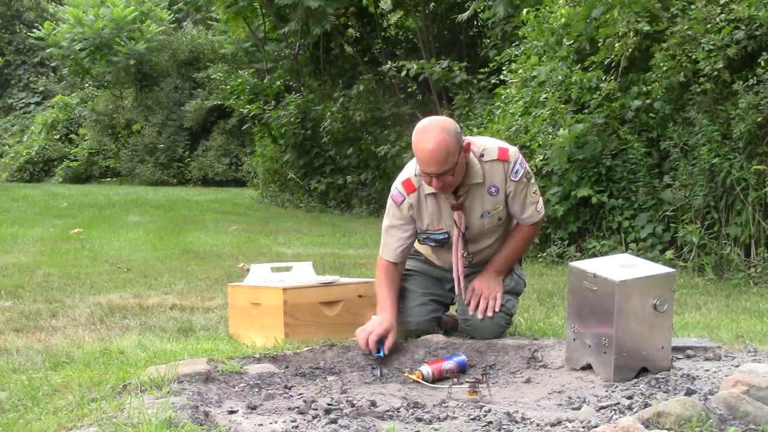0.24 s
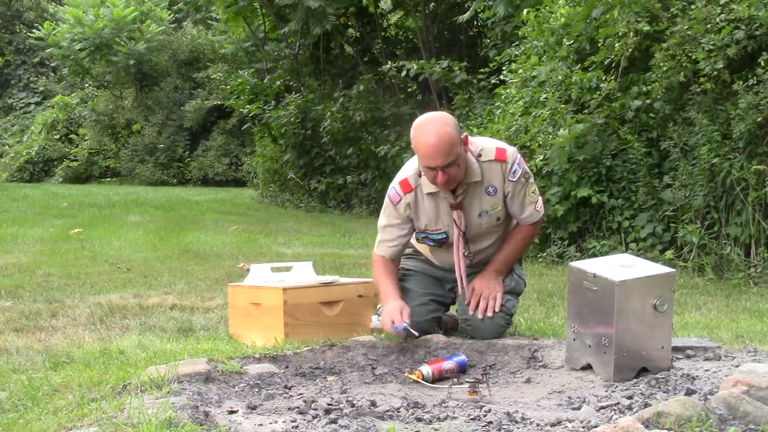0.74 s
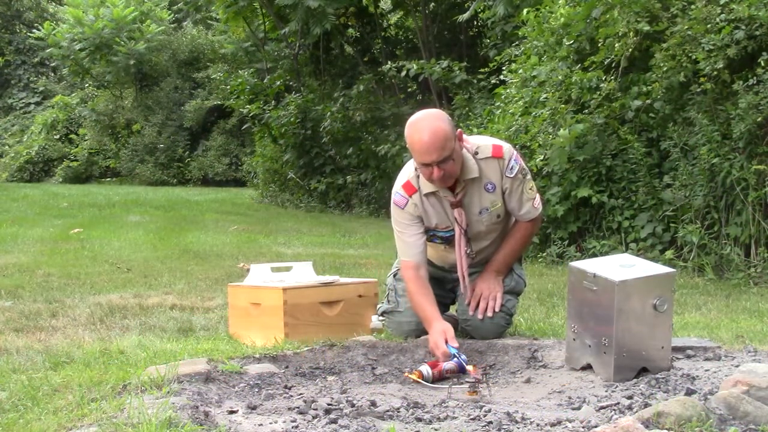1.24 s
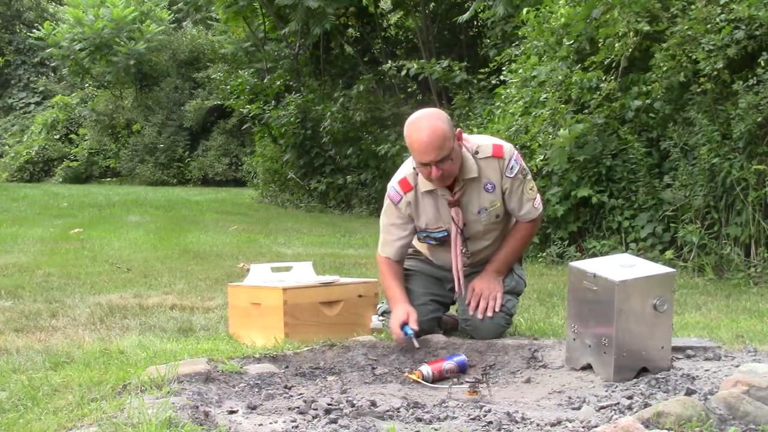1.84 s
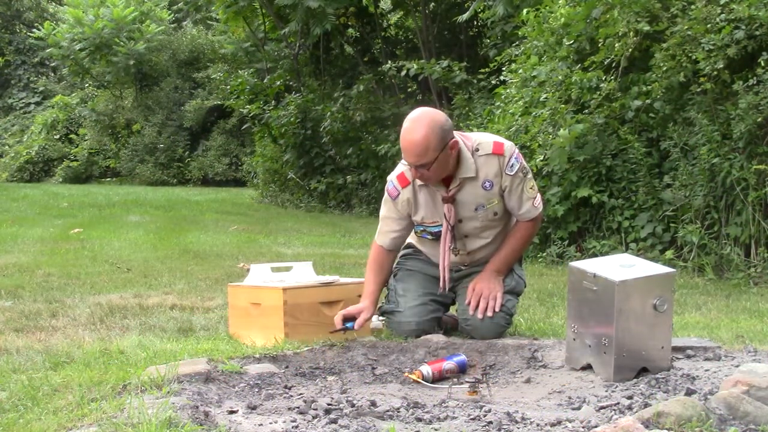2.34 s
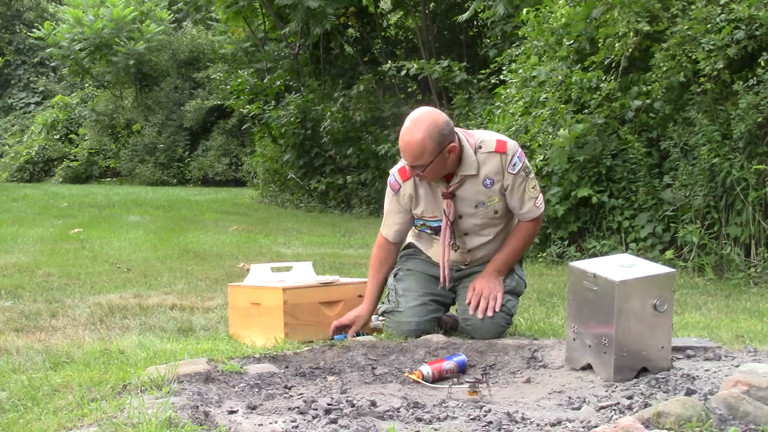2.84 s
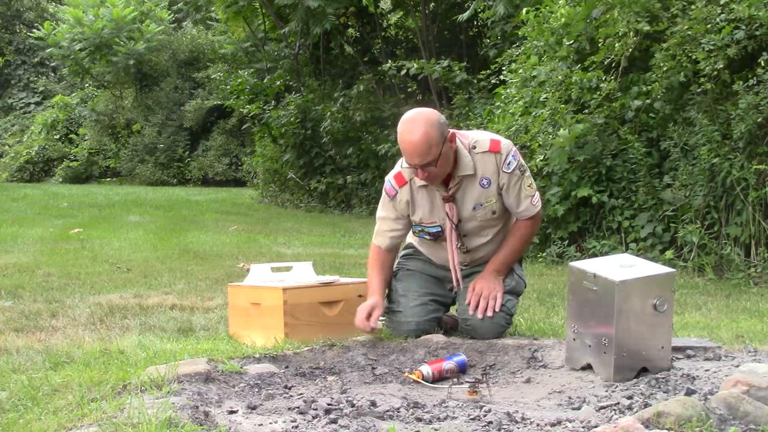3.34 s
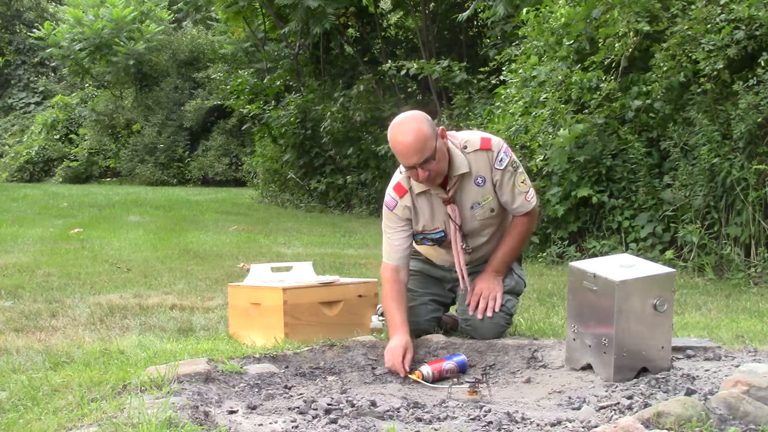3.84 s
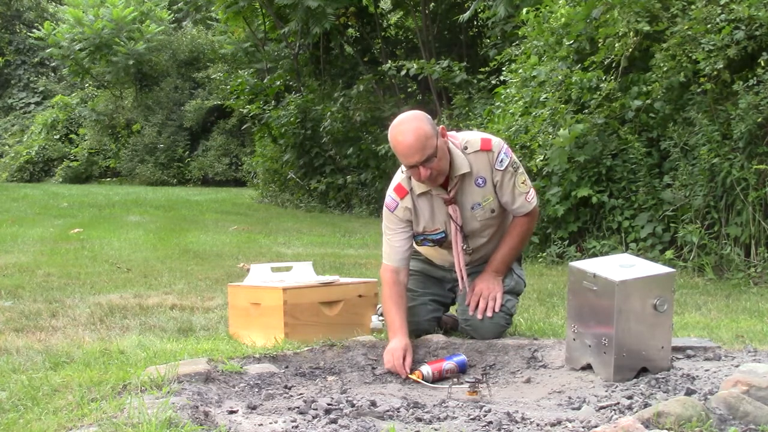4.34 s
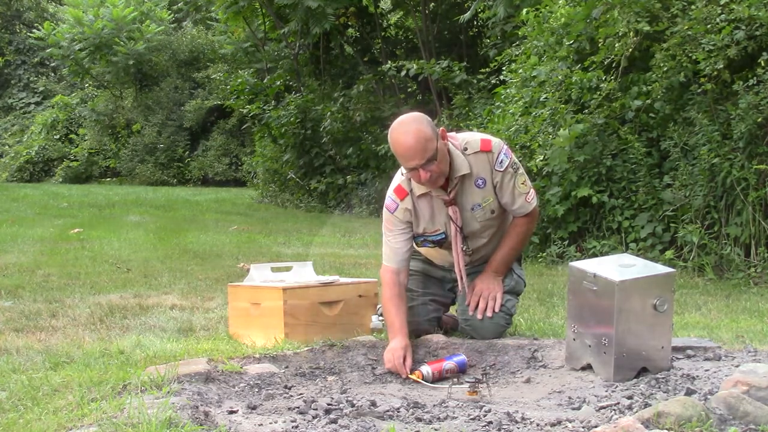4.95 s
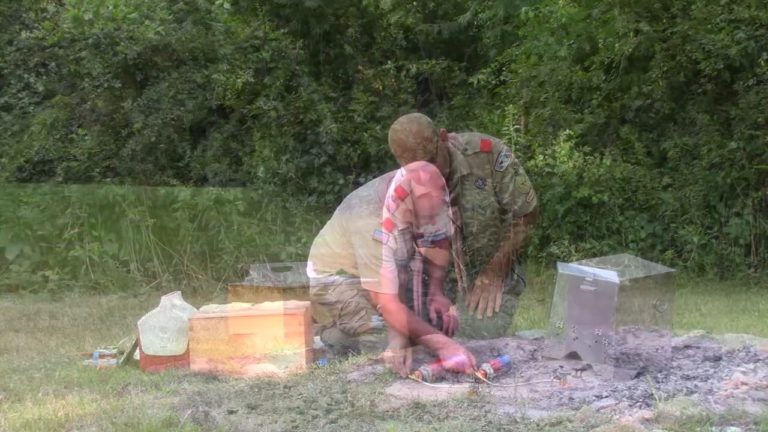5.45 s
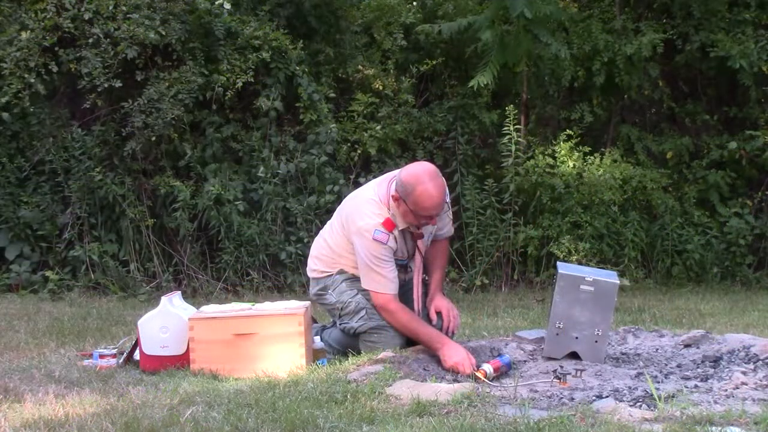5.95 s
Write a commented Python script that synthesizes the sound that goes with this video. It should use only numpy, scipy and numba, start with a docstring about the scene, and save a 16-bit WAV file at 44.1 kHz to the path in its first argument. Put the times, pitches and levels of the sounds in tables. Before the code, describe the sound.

After light rustles and two sharp lighter clicks, fuel vapour ignites with a soft thump and burns steadily over faint insects.

```python
"""A small spirit stove is lit on the ground at the edge of a lawn, heard from close by. Over open air, a far
rumble and a faint wandering hiss come two thin notes, rustles and small knocks. A lighter snaps twice, its
hammer ringing the case; the vapour catches with a soft whump and burns on with a low turbulent rush, while high
insects shimmer in the hedge. Near the end the sound steps with a tick: the hiss falls back and a soft midrange
wash comes up."""
import sys
import numpy as np
from scipy import signal
from scipy.fft import rfft, irfft
from scipy.io import wavfile
from scipy.ndimage import uniform_filter1d
from numba import njit

SR = 44100
rng = np.random.default_rng(int(sys.argv[2]) if len(sys.argv) > 2 else 0)


def generate_wav(sig):
    """Save sig (samples, or channels by samples) to the path in sys.argv[1] as 16-bit PCM at SR."""
    pcm = np.round(np.clip(np.atleast_2d(sig).T, -1, 1) * 32767).astype(np.int16)
    wavfile.write(sys.argv[1], SR, pcm)


N = 273420
TIME = np.arange(N) / SR
LIT_S, STEP_S = 1.2575, 5.396

# spectrum of burning vapour: frequency_hz, density_db
FLAME_COLOUR = [(30, -53), (80, -8.5), (125, -6.5), (200, 0), (300, -.5), (390, 1.5), (450, -4), (540, -10),
                (630, -20), (720, -29.5), (850, -45), (1800, -74)]


def from_db(db):
    """Decibels to gain."""
    return 10 ** (np.asarray(db) / 20)


def unit_rms(x):
    """Scale to unit rms."""
    return x / np.sqrt(np.mean(x ** 2) + 1e-20)


def unit_hit(x):
    """Scale a hit so that its loudest 2 ms have unit rms."""
    return x / np.sqrt(uniform_filter1d(x * x, size=88).max())


def automation(rows):
    """Join breakpoints (time first) into one curve per remaining column."""
    times, *columns = np.transpose(rows)
    return [np.interp(TIME, times, column) for column in columns]


def late_switch(early, late):
    """Step from one setting to another where the sound steps near the end."""
    return np.where(TIME < STEP_S, early, late)


def dying(start_s, decay_s):
    """Envelope that jumps to 1 and dies away."""
    return (TIME >= start_s) * np.exp(-np.clip((TIME - start_s) / decay_s, 0, 60))


def swell(peak_s, half_length_s):
    """Bell-shaped envelope."""
    return np.exp(-.5 * ((TIME - peak_s) / half_length_s) ** 2)


def noise(colour):
    """Unit noise with the given spectrum, rolled off below its first point."""
    hz, db = np.transpose(colour)
    grid = np.maximum(np.fft.rfftfreq(N, 1 / SR), 1)
    gain = from_db(np.interp(np.log(grid), np.log(hz), db))
    low_cut = np.minimum(grid / hz[0], 1) ** 2 * (grid > 1)
    return unit_rms(irfft(rfft(rng.standard_normal(N)) * gain * low_cut, N))


def drift(rate_hz):
    """Smooth random wander of spread 1, up to about rate_hz."""
    grid = np.fft.rfftfreq(N, 1 / SR)
    return unit_rms(irfft(rfft(rng.standard_normal(N)) / (1 + (grid / rate_hz) ** 2), N))


def narrow_noise(hz, width_hz):
    """Unit noise in a steep-sided band round a centre that may move."""
    offset_hz = np.fft.fftfreq(N, 1 / SR)
    white = rng.standard_normal(N) + 1j * rng.standard_normal(N)
    wobble = np.fft.ifft(np.fft.fft(white) / (1 + np.abs(offset_hz / width_hz) ** 3))
    carrier = np.exp(2j * np.pi * np.cumsum(hz * np.ones(N)) / SR)
    return unit_rms(np.real(wobble * carrier))


def resonate(x, hz, width_hz):
    """One resonance with gain 1 at its peak."""
    r = np.exp(-np.pi * width_hz / SR)
    feedback = [1, -(1 + r * r) * np.cos(2 * np.pi * hz / SR), r * r]
    return signal.lfilter(np.array([1, 0, -1]) * (1 - r * r) / 2, feedback, x + 1e-18)


@njit
def swept_resonance(x, hz, width_hz):
    """The same resonance with a centre that moves sample by sample."""
    r = np.exp(-np.pi * width_hz / SR)
    coupling = (1 + r * r) * np.cos(2 * np.pi * hz / SR)
    y = np.zeros(len(x))
    for i in range(2, len(x)):
        y[i] = (1 - r * r) / 2 * (x[i] - x[i - 2]) + coupling[i] * y[i - 1] - r * r * y[i - 2]
    return y


def outdoors(air_trim_db=4.5, late_air_db=-55, wash_rise_db_per_s=3):
    """Leaves and open air over a far rumble; a soft wash creeps in and steps up near the end."""
    # rise and fall of the open air: time_s, level_db
    air_levels = [(0.05, -58.5), (0.37, -55), (0.74, -60), (1.13, -53.5), (2.23, -61), (4.98, -59.5),
                  (5.18, -58.5), (5.3, -57.5)]
    # spectrum of the air: frequency_hz, density_db
    air_colour = [(200, 0), (600, 2), (850, -0.5), (1200, 0.5), (1700, 2), (2500, 0.5), (3100, 0),
                  (5000, -5.5), (8000, -9.5), (11000, -15.5), (16000, -17.5)]
    # spectrum of the rumble: frequency_hz, density_db
    rumble_colour = [(20, 1.5), (40, -7.5), (50, 1), (58, 6.5), (72, -2.5), (95, -7), (118, 0), (145, -7),
                     (220, -13), (400, -13.5), (800, -29), (3000, -84)]
    air_db, = automation(air_levels)
    air_db = late_switch(air_db + air_trim_db, late_air_db)
    rumble_db = late_switch(np.where(TIME < LIT_S, -44, -47.5), -44)   # ducks while the stove first burns
    wash_db = late_switch(-81 + wash_rise_db_per_s * TIME, -57.5)
    air = from_db(air_db) * noise(air_colour)
    rumble = from_db(rumble_db) * noise(rumble_colour)
    wash = from_db(wash_db) * narrow_noise(hz=1100, width_hz=280)
    return air + rumble + wash


def hiss(trim_db=3.5, late_db=-53, ease_db_per_s=4, sizzle_trim_db=-1, late_sizzle_db=-72):
    """A faint broad hiss topped by thin sizzle; near the end the sizzle drops and the hiss eases."""
    # rise and fall of the hiss: time_s, level_db
    hiss_levels = [(0.05, -57), (0.92, -58.5), (1.72, -64), (2.13, -60.5), (2.52, -61), (3.39, -62.5),
                   (3.86, -55.5), (5.2, -55.5), (5.36, -56.5)]
    # spectrum of the hiss: frequency_hz, density_db
    hiss_colour = [(2600, -25), (3100, -15.5), (3430, 2), (4100, 2), (5200, 0), (6100, -2), (6700, -1),
                   (7500, -6), (8400, -8), (9100, -8.5), (12000, -42)]
    # rise and fall of the sizzle: time_s, level_db
    sizzle_levels = [(.1, -66), (.6, -57), (1.1, -56.5), (1.28, -68), (1.47, -57), (2.05, -58), (2.9, -71),
                     (3.4, -64), (5.02, -72), (5.25, -52.5)]
    # spectrum of the sizzle: frequency_hz, density_db
    sizzle_colour = [(5000, -12), (6600, 8), (7300, 3.5), (8300, -11), (9200, 1), (11500, -2.5),
                     (12800, -12), (14500, -1), (16000, -12)]
    hiss_db, = automation(hiss_levels)
    sizzle_db, = automation(sizzle_levels)
    hiss_db = late_switch(hiss_db + trim_db, late_db - ease_db_per_s * (TIME - STEP_S))
    sizzle_db = late_switch(sizzle_db + sizzle_trim_db, late_sizzle_db)
    return from_db(hiss_db) * noise(hiss_colour) + from_db(sizzle_db) * noise(sizzle_colour)


def wandering_hiss(trim_db=-0.3, fade_db_per_s=60):
    """A narrow band of hiss wanders and fades after the lighting; a higher one then comes in surges."""
    # path of the wandering band: time_s, centre_hz, level_db
    path = [(.05, 6260, -55.5), (.26, 5590, -53), (.6, 5880, -52.5), (.86, 6410, -49), (.95, 5530, -45.5),
            (1.2, 5420, -50), (1.3, 5550, -60), (1.47, 5640, -56), (1.75, 4470, -58)]
    # surges of the higher band: peak_s, level_db, half_length_s
    surges = [(2.38, -57, 0.12), (3.304, -60.5, 0.11), (4.25, -68, 0.048), (5.28, -53.5, 0.22)]
    centre_hz, level_db = automation(path)
    fade_db = fade_db_per_s * np.maximum(TIME - path[-1][0], 0)
    wandering = from_db(level_db + trim_db - fade_db) * narrow_noise(centre_hz, width_hz=720)
    surging = sum(from_db(db) * swell(peak_s, half_s) for peak_s, db, half_s in surges)
    return wandering + late_switch(surging, 0) * narrow_noise(hz=7010, width_hz=550)


def hollowed(x, late_depth=0.75, late_upper_depth=0.2, late_lowest_hz=3540):
    """Narrow notches come and go, as when a near reflection cancels parts of the sound."""
    # course of the hollowness: time_s, depth (0-1), lowest_notch_hz
    hollowness = [(1.8, 0.23, 3280), (2.2, 0.57, 3300), (3.1, .2, 3200), (3.9, 0.65, 2990),
                  (5.39, 0.77, 2830)]
    # the higher notches: centre_hz, width_hz
    upper_notches = [(6620, 150), (9050, 585), (11400, 450)]
    depth, lowest_hz = automation(hollowness)
    lowest_hz = late_switch(lowest_hz, late_lowest_hz)
    x = x - late_switch(depth, late_depth) * swept_resonance(x, lowest_hz, width_hz=750)
    for hz, width_hz in upper_notches:
        x = x - late_switch(depth, late_upper_depth) * resonate(x, hz, width_hz)
    return x


def swishing(x):
    """The treble swishes: patches some 500 Hz wide swell and fade within a quarter second."""
    hz, _, frames = signal.stft(x, SR, nperseg=512)
    patches = rng.standard_normal(frames.shape)
    for _ in range(2):
        patches = uniform_filter1d(patches, size=6, axis=0)   # across frequency
        patches = uniform_filter1d(patches, size=30, axis=1)   # across time
    depth_db = np.interp(hz, [1000, 3500, 7000], [0, 1.3, 2.1])
    gain = from_db(depth_db[:, None] * unit_rms(patches))
    return signal.istft(frames * gain, SR)[1][:N]


def whistle(half_length_s=0.024, fall_hz_per_s=1000):
    """A thin far whistle of two notes, each falling slightly."""
    # whistled notes: peak_s, pitch_hz, level_db
    notes = [(.212, 3480, -50.5), (.337, 3350, -52)]
    out = np.zeros(N)
    for peak_s, pitch_hz, db in notes:
        glide_hz = pitch_hz - fall_hz_per_s * (TIME - peak_s)
        out += from_db(db) * swell(peak_s, half_length_s) * np.sin(2 * np.pi * np.cumsum(glide_hz) / SR)
    return out


def rustles():
    """Sleeve and grass rub in short soft swells of friction noise."""
    # brushes of cloth and grass: peak_s, level_db, half_length_s, centre_hz, width_hz
    brushes = [(0.271, -47, 0.016, 2960, 3500), (0.73, -50.5, 0.029, 2650, 1200),
               (1.083, -45.5, 0.015, 1790, 2500), (1.93, -58, 0.038, 1460, 1500),
               (3.104, -53, 0.021, 2580, 3490)]
    out = np.zeros(N)
    for peak_s, db, half_length_s, hz, width_hz in brushes:
        friction = unit_rms(resonate(rng.standard_normal(N), hz, width_hz))
        out += from_db(db) * swell(peak_s, half_length_s) * friction
    return out


def knocks(bump_hz=105, bump_decay_s=0.0022):
    """Gritty ticks and soft bumps, mostly of handling; the last tick falls where the sound steps."""
    # small knocks and ticks: start_s, level_db, centre_hz, width_hz, decay_s
    ticks = [(.308, -38, 1740, 200, 0.0085), (0.4563, -32, 2200, 3200, 0.0012),
             (0.4617, -30, 1230, 650, 0.0064), (0.688, -37.5, 6900, 4000, 0.0024),
             (.789, -42.5, 1800, 2500, 0.0034), (.861, -44.5, 800, 600, 0.0033),
             (0.8838, -26, 4480, 3500, 0.001), (0.887, -29, 418, 500, 0.0034),
             (1.0772, -32.5, 4800, 900, 0.0022), (1.1794, -34.5, 1620, 904, 0.0012),
             (1.459, -36, 3440, 4000, 0.002), (1.464, -31.5, 2720, 3460, 0.0027),
             (1.5168, -42, 2740, 2000, 0.0012), (5.393, -41.5, 1800, 5000, 0.0013)]
    # dull bumps of the arm: start_s, level_db
    bumps = [(0.3804, -24), (0.4913, -17), (.5430, -22.5)]
    out = np.zeros(N)
    for start_s, db, hz, width_hz, decay_s in ticks:
        grit = rng.standard_normal(N) * dying(start_s, decay_s)
        out += from_db(db) * unit_hit(resonate(grit, hz, width_hz))
    for start_s, db in bumps:
        out += from_db(db) * dying(start_s, bump_decay_s) * np.sin(2 * np.pi * bump_hz * (TIME - start_s))
    return out


def lighter(rattle_gain=0.091, tail_db=-27, tail_decay_s=0.01, low_cut_hz=1000):
    """The sprung hammer hits, rattles for a moment and rings the plastic case."""
    # hammer blows: start_s, level_db, rattle_decay_s
    snaps = [(0.8862, -6, 0.0013), (1.2198, -7, 0.0016)]
    # case modes, one set per snap as the grip differs: pitch_hz, width_hz, level_db
    case_modes = [
        [(1710, 200, 3), (2250, 300, -10), (3200, 450, -4), (4310, 240, -2), (5300, 390, -4), (6170, 220, -1),
         (6600, 80, -17), (7820, 160, -4), (8700, 450, -6), (11200, 350, -8), (12700, 420, -14),
         (14400, 500, -14)],
        [(1120, 150, -12), (1800, 380, 0), (2480, 170, -5), (2900, 300, -10), (3460, 200, -7), (4500, 620, -4),
         (6200, 150, -4), (7500, 540, -13), (8890, 400, -13), (10850, 260, 0), (12200, 500, -13),
         (15300, 500, -10)],
    ]
    low_cut = signal.butter(2, low_cut_hz, "high", fs=SR, output="sos")   # a small body has little bass
    out = np.zeros(N)
    for (start_s, db, decay_s), modes in zip(snaps, case_modes):
        rattle = dying(start_s, decay_s) + from_db(tail_db) * dying(start_s, tail_decay_s)
        force = rattle_gain * rng.standard_normal(N) * rattle
        force[round(start_s * SR)] += 1
        # the blow reaches each part of the case within a millisecond
        lags = (rng.random(len(modes)) * SR / 1000).astype(int)
        case = np.zeros(N)
        for (hz, width_hz, mode_db), lag in zip(modes, lags):
            ring = unit_rms(resonate(force, hz, width_hz))
            case += from_db(mode_db) * np.sqrt(width_hz) * np.roll(ring, lag)
        out += from_db(db) * unit_hit(signal.sosfilt(low_cut, case))
    return out


def insects(start_s=1.05, rise_s=0.6, lower_trim_db=1, upper_trim_db=-1.5, waver_db=1.5):
    """Many far stridulations merge into two high shimmering bands, each wavering on its own."""
    # two kinds of insects in the hedge: time_s, lower_band_db, upper_band_db
    chorus = [(1.7, -66, -68.5), (2.1, -68, -63.5), (2.5, -62, -69), (3.0, -67, -73), (3.55, -57.5, -65.5),
              (3.72, -61, -74), (3.97, -56.5, -58), (4.28, -56.5, -60.5), (4.43, -58, -71),
              (4.78, -66, -58.5), (5.15, -51.5, -58), (5.39, -55, -57)]
    lower_db, upper_db = automation(chorus)
    lower = narrow_noise(hz=6050, width_hz=290)
    upper = narrow_noise(hz=10050, width_hz=360)
    lower *= from_db(late_switch(lower_db + lower_trim_db, -60) + waver_db * drift(rate_hz=4))
    upper *= from_db(late_switch(upper_db + upper_trim_db, -73) + waver_db * drift(rate_hz=4))
    fade_in = np.clip((TIME - start_s) / rise_s, 0, 1)
    shimmer = from_db(drift(rate_hz=25))
    return fade_in * shimmer * (lower + upper)


def ignition(whump_db=-0.37, flare_db=-15, suction_s=0.0028, push_s=0.0075):
    """The fireball pushes air out, sucks it back and rebounds, with a turbulent flare at its height."""
    suction = swell(LIT_S, suction_s)
    push = swell(LIT_S + suction_s / 2, push_s) * suction_s / push_s   # moves as much air as the suction
    flare = noise(FLAME_COLOUR) * swell(LIT_S, half_length_s=0.0056)
    return from_db(whump_db) * (push - suction) + from_db(flare_db) * flare


def flame(trim_db=0.27, flutter_db=0.3, cold_pitch_ratio=0.93, warm_up_s=1.0, roar_db=-35):
    """Turbulent burning: a low, fluttering rush that starts with the whump, deeper while still cold."""
    # strength of the flame: time_s, level_db
    strength = [(1.28, -30), (1.6, -33.5), (1.7, -35.5), (2.5, -35), (2.82, -37), (3.3, -35.5), (3.9, -35),
                (5.25, -35), (5.45, -30.5), (6.2, -33)]
    rush_db, = automation(strength)
    coldness = dying(LIT_S, warm_up_s)
    cold_rush = noise([(hz * cold_pitch_ratio, db) for hz, db in FLAME_COLOUR])
    rush = np.sqrt(coldness) * cold_rush + np.sqrt(1 - coldness) * noise(FLAME_COLOUR)
    # the first tall flame adds a deeper roar that soon dies down
    roar = from_db(roar_db) * dying(LIT_S, decay_s=0.26) * narrow_noise(hz=169.4, width_hz=44)
    rush *= from_db(rush_db + trim_db - flutter_db * drift(rate_hz=12))
    lit = np.clip((TIME - LIT_S) / .01, 0, 1)
    return lit * (rush + roar)


def scene():
    """Small close sounds and the stove, dry, over the outdoor bed; mono."""
    close_sounds = lighter() + knocks() + rustles()
    bed = swishing(hollowed(hiss() + wandering_hiss() + outdoors()))
    background = bed + insects() + whistle()
    return (close_sounds + ignition() + flame() + background)[None]


def record(dry, cutoff_hz=15900):
    """The snaps clip at full scale; a steep low-pass cuts the very top."""
    clipped = np.clip(dry, -1, 1)
    return signal.sosfilt(signal.ellip(12, .1, 100, cutoff_hz, fs=SR, output="sos"), clipped)


dry = scene()
out = record(dry)
generate_wav(out)
```